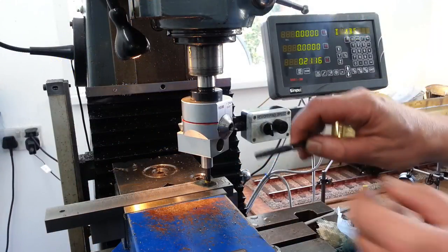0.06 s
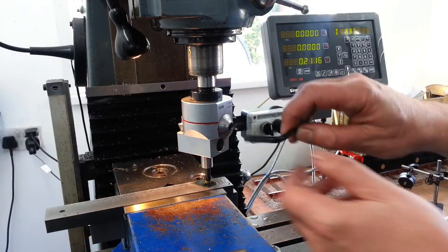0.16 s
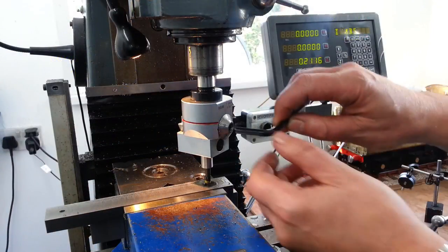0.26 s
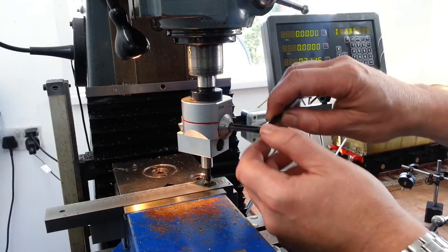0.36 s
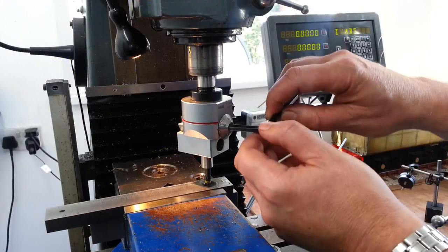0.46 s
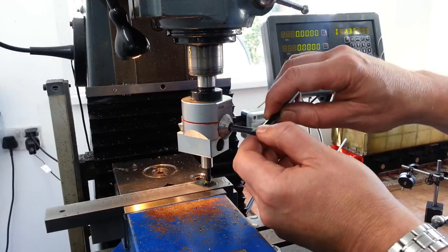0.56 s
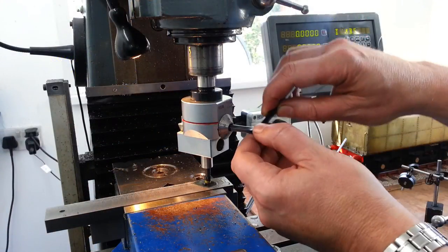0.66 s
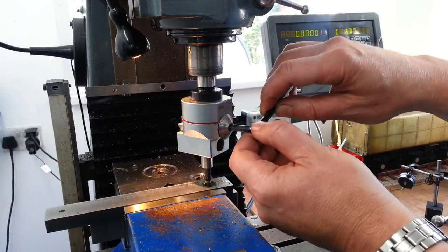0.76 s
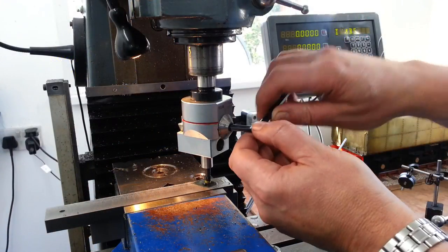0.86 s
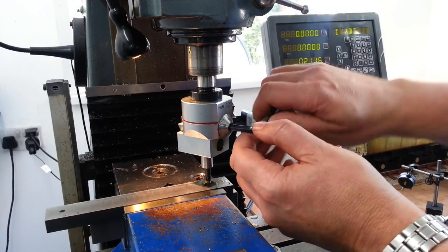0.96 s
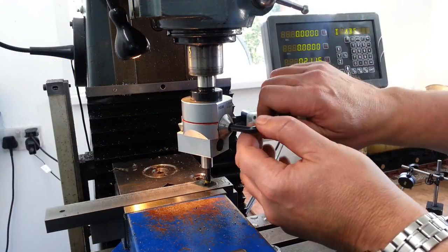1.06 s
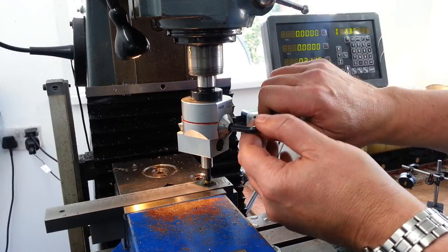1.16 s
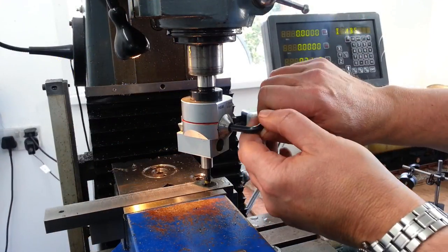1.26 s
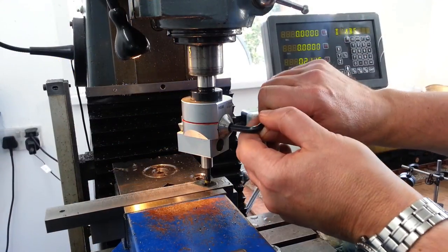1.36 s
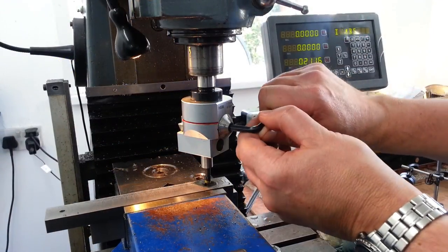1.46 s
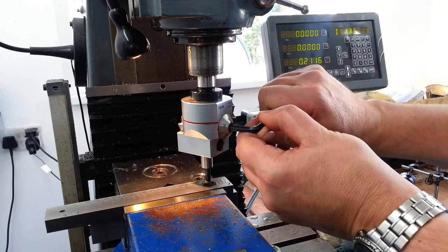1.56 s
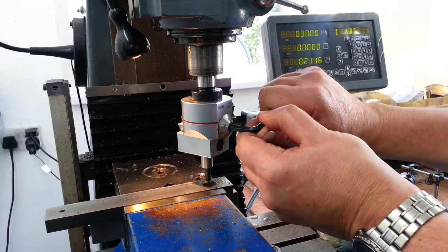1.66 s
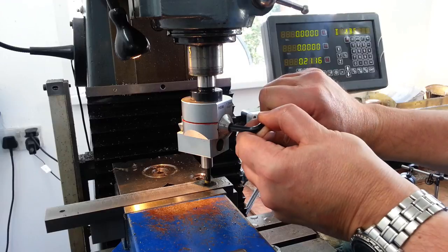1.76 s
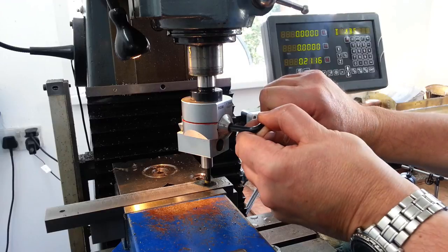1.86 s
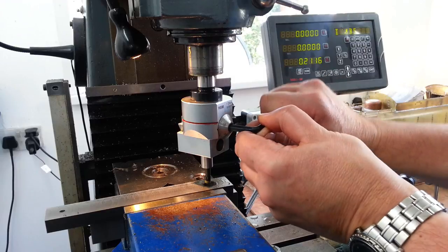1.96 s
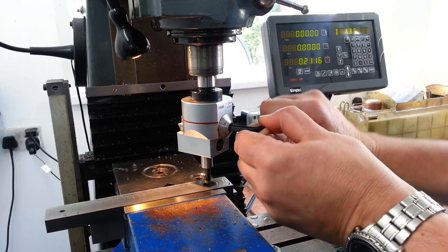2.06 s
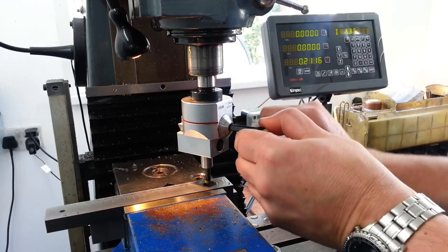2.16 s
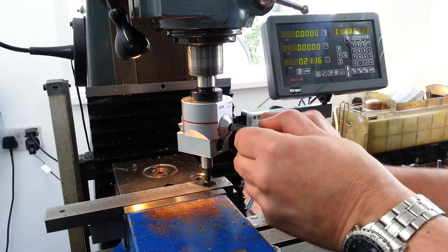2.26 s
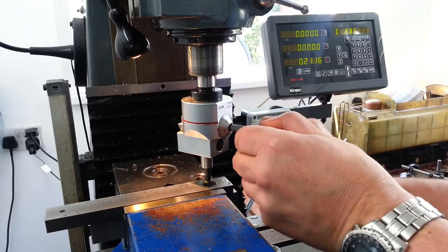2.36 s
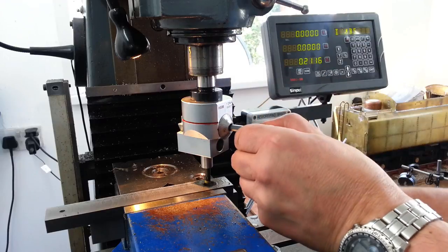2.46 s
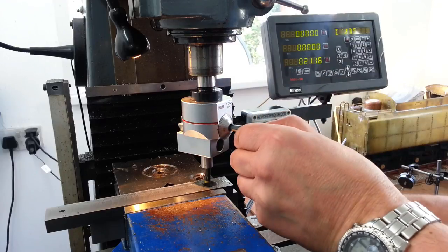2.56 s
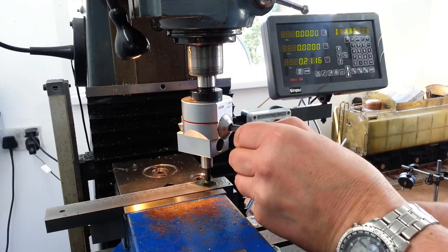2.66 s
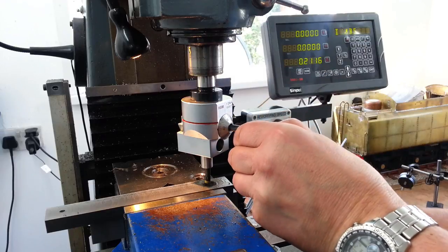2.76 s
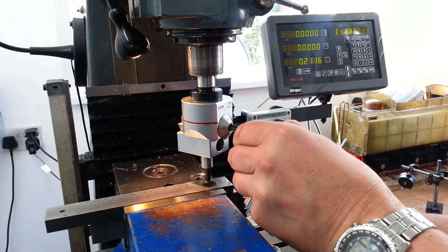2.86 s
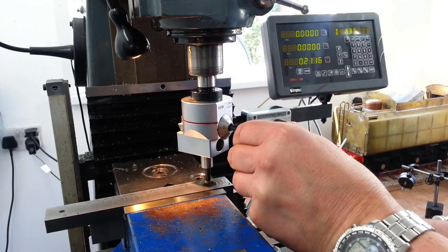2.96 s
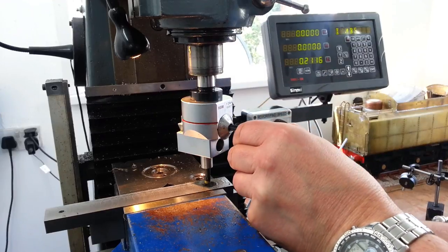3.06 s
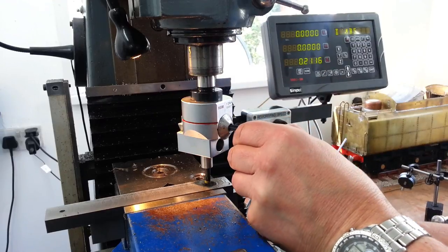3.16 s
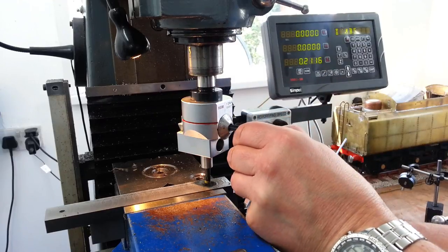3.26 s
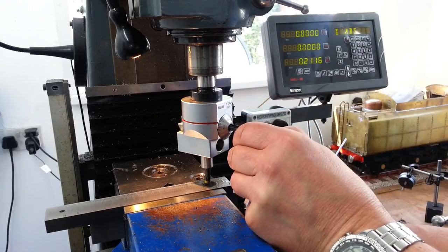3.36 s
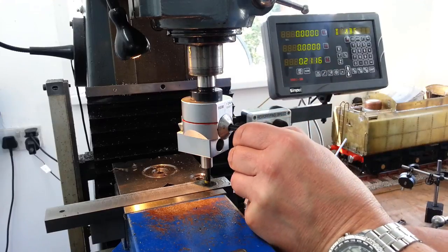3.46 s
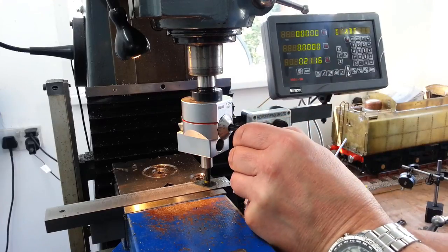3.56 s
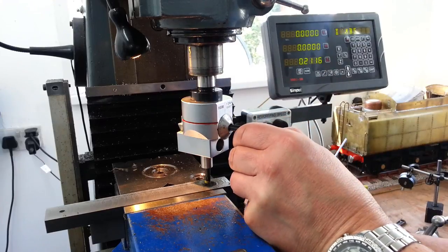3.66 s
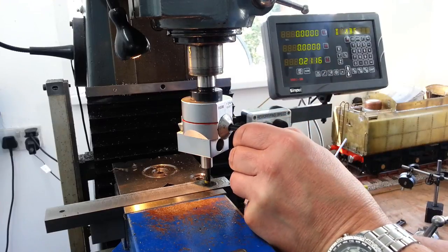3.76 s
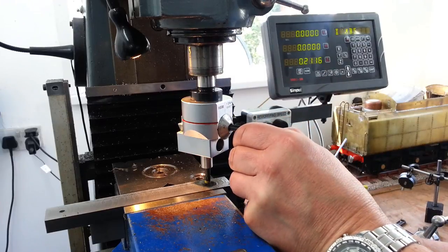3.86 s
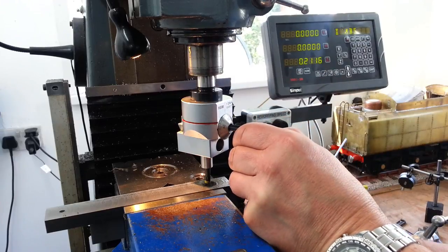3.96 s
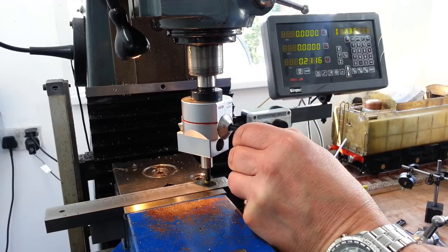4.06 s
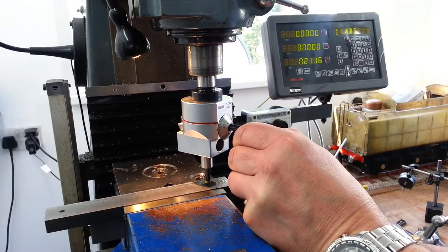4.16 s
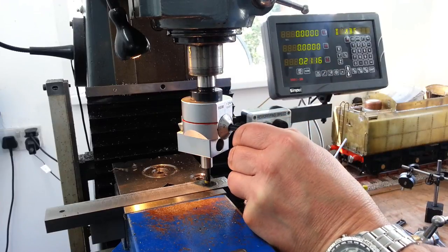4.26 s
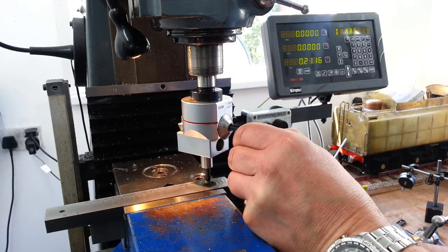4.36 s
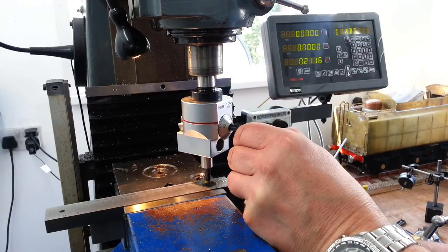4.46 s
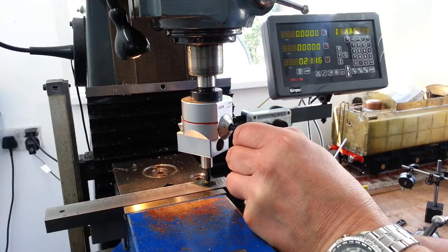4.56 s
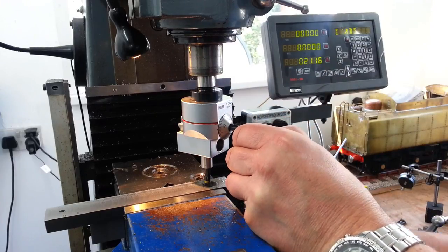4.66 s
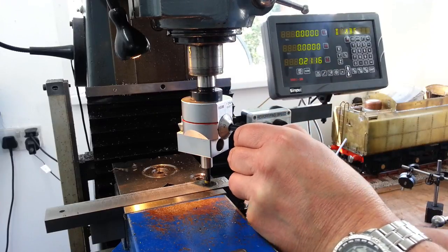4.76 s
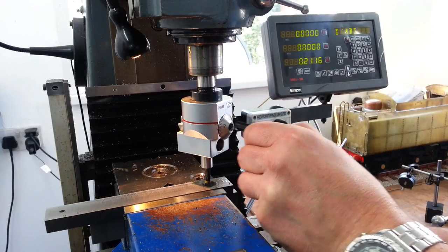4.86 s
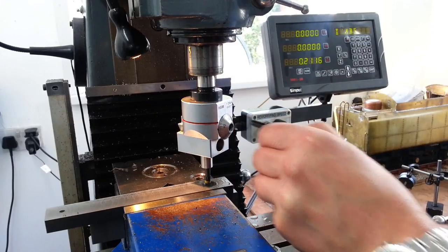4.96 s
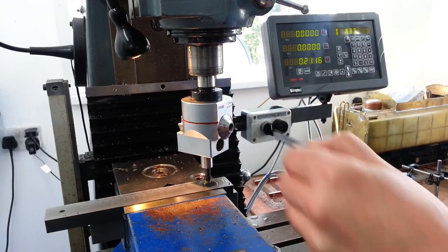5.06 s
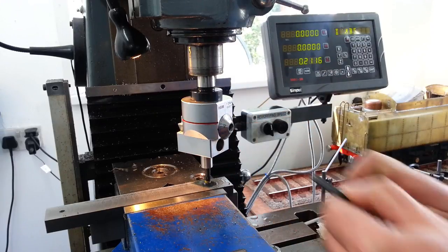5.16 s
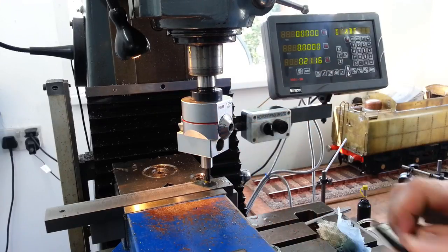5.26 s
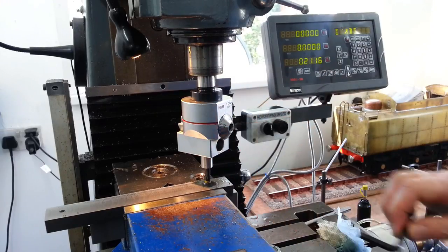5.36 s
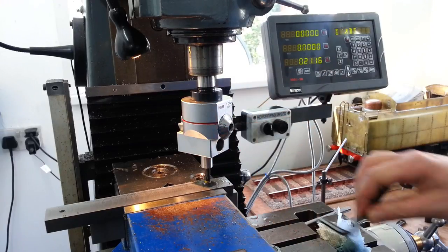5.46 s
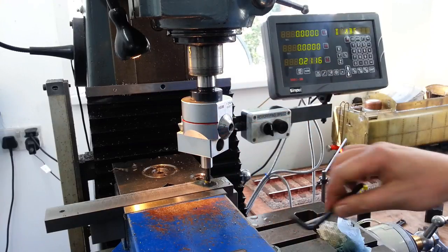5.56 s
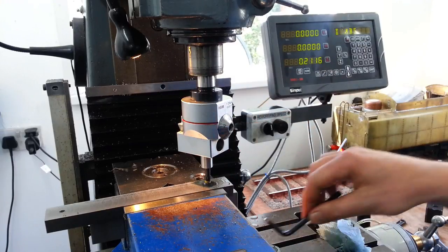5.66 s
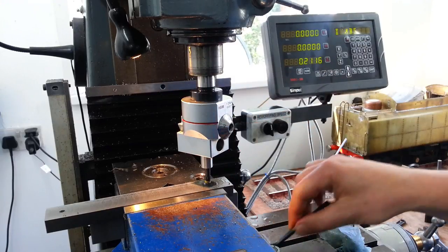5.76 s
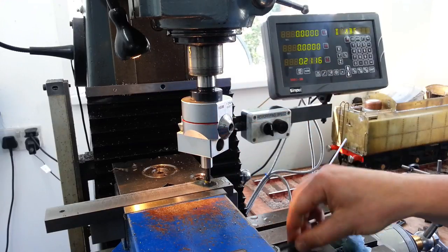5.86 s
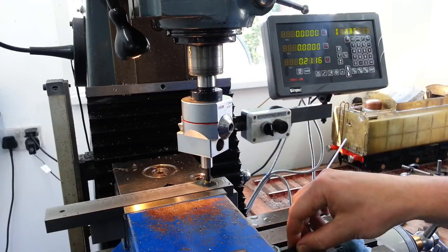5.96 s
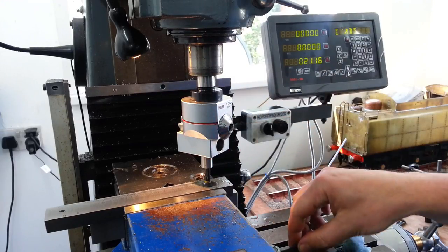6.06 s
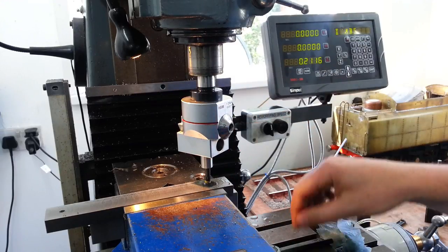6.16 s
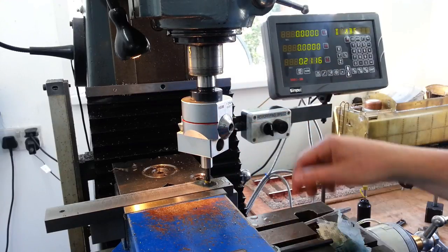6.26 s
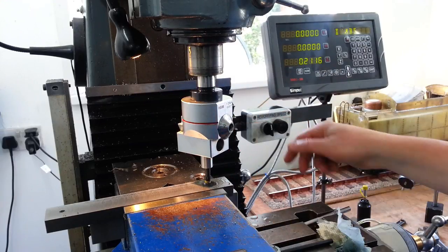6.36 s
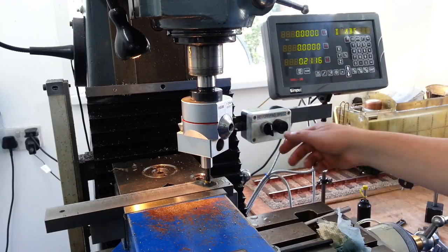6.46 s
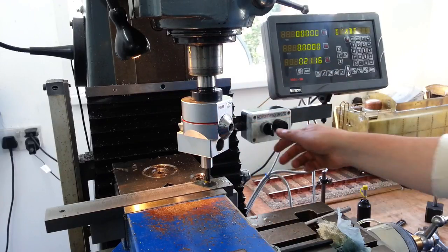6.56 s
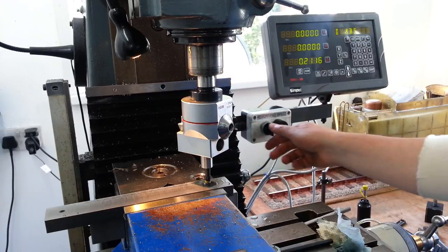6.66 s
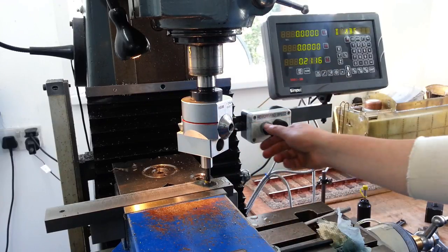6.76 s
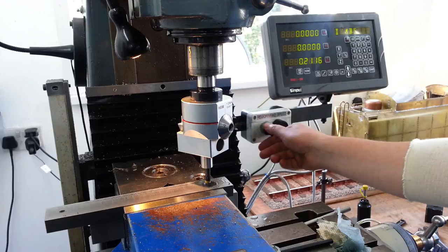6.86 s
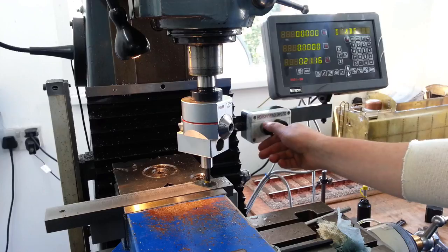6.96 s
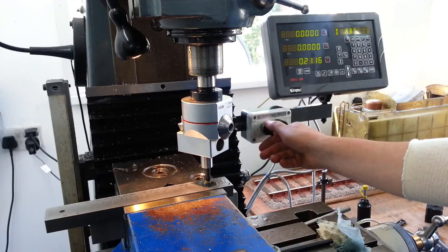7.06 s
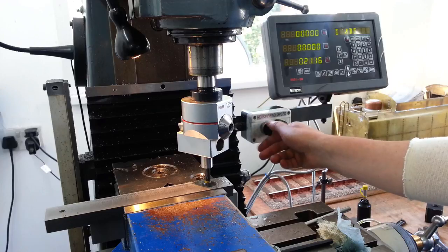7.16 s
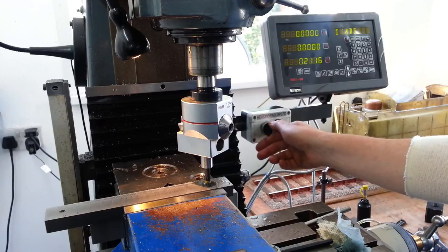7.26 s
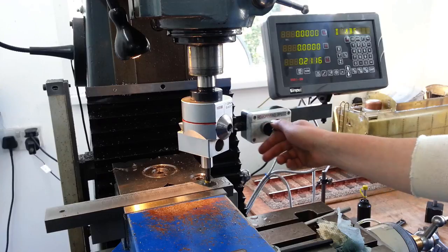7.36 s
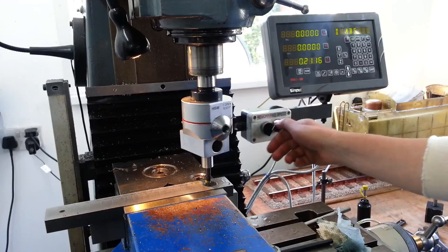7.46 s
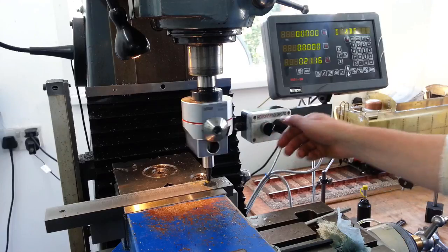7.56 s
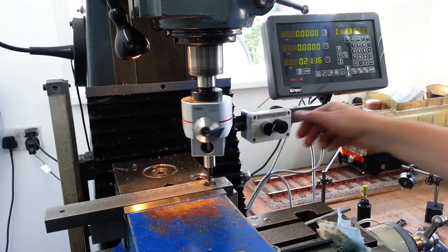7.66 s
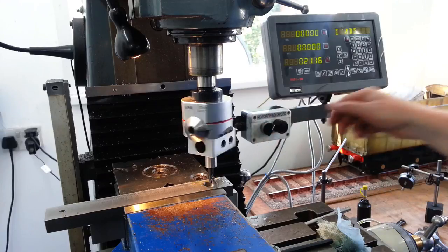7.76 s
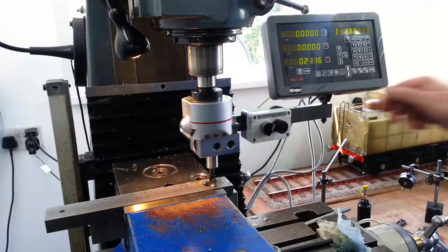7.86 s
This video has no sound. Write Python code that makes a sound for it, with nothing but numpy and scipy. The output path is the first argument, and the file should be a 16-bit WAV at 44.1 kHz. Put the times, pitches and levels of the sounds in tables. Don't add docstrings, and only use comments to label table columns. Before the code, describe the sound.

Constant low hum and buzzing laminations, with faint fan and air noise behind. First come a few light steel ticks and dull bumps, then mostly hum. Near the end, a small metal key comes loose and lands on iron with bright ringing bounces; soft finger touches lead to a sharp, rattling switch snap. A thin electronic whine follows, then a rough burst of gear clatter as the machine starts. Stereo pickup nearby in a hard, lively room.

```python
import sys
import numpy as np
from scipy import signal
from scipy.fft import irfft
from scipy.io import wavfile

SR = 44100
rng = np.random.default_rng(int(sys.argv[2]) if len(sys.argv) > 2 else 0)


def to_wav(sig):
    pcm = np.clip(np.atleast_2d(sig), -1, 1) * 32767
    pcm = np.round(pcm).astype(np.int16)
    wavfile.write(sys.argv[1], SR, pcm.T)


def volts(x):
    e = np.asarray(x, float) / 20
    return 10 ** e


N = 349704


def in_time(rows):
    s, *columns = np.transpose(rows)
    return [np.interp(np.arange(N) / SR, s, column) for column in columns]


def at_hz(points, hz):
    table_hz, values = np.transpose(points)
    return np.interp(np.log(hz), np.log(table_hz), values)


def rms_one(x):
    return x / np.sqrt(np.mean(x ** 2) + 1e-20)


def band(x, low_hz, high_hz):
    return signal.sosfilt(signal.butter(2, [low_hz, high_hz], "band", fs=SR, output="sos"), x)


def top_cut(x):
    return signal.sosfilt(signal.ellip(8, .5, 45, 14650, fs=SR, output="sos"), x)


def drift(rate_hz):
    r = np.exp(-80 * np.pi * rate_hz / SR)
    slow = signal.lfilter([1], [1, -2 * r, r * r], rng.standard_normal(N // 40 + 2002))[2000:]
    return np.interp(np.arange(N) / 40, np.arange(len(slow)), rms_one(slow))


def resonate(x, modes):
    out = 0
    for k, (hz, width_hz, db) in enumerate(modes):
        r = np.exp(-np.pi * width_hz / SR)
        poles = [1, -2 * r * np.cos(2 * np.pi * hz / SR), r * r]
        out = out + (-1) ** k * volts(db) * rms_one(signal.lfilter([1, 0, -1], poles, x))
    return rms_one(out)


def stereo(mid, side, alike):
    return np.sqrt(1 + alike) * mid + np.sqrt(1 - alike) * side * [[1], [-1]]


def add(track, s, sound):
    i = round(s * SR)
    track[i:i + len(sound)] += sound[:N - i]


def burst(decay_s):
    crack = rng.standard_normal(SR // 2) * np.exp(-np.arange(SR // 2) / (decay_s * SR))
    return crack / np.abs(crack).max() + 1e-18


def ring(hz, db, t60):
    t = np.arange(SR // 2) / SR
    return volts(db - 60 * t / t60) * np.sin(2 * np.pi * hz * t) * (1 - np.exp(-t / .0006))


# (time [s], frequency [Hz])
MAINS = [(0, 49.925), (8, 49.905)]
# (mains multiple, left level [dB], right level [dB], right lead [rad])
CORE = [(2, -80.7, -71.5, -0.5), (4, -58.1, -58.2, 0.2), (6, -65.3, -66.1, 0.5), (8, -64.5, -61.8, 0.5),
        (10, -75.4, -66.0, 1.0), (12, -58.1, -53.7, 0.4), (16, -68.1, -72.9, 2.1), (22, -66.9, -78.4, 2.4),
        (26, -70.4, -70.3, 2.2)]
# (mains multiple, left level [dB], right level [dB], right lead [rad])
LAMINATIONS = [(30, -71.9, -71.9, 3.1), (36, -74.9, -71.5, 2.5), (50, -67.3, -69.7, 0.8),
               (52, -68.1, -72.4, 2.5), (54, -74.5, -70.0, -0.8), (56, -66.5, -61.8, 0.5),
               (58, -81.4, -70.6, 1.8), (60, -70.1, -77.3, 1.7), (64, -64.5, -67.1, 2.9),
               (68, -71.4, -72.8, -0.1), (70, -75.7, -65.7, -0.5), (72, -77.2, -65.0, 0.8),
               (74, -74.8, -67.9, 2.0), (76, -77.1, -70.4, -0.4)]
# (frequency [Hz], level [dB])
FAINT_COMB = [(500, -80), (1500, -77), (2500, -76), (3800, -77), (5000, -83), (6500, -92)]
# (time [s], level of the 12th multiple [dB])
ARM = [(0, 2), (1, 0), (5.6, -1.5), (5.9, 5), (6.5, 2.5), (7.2, 3), (7.9, 8)]


def hum():
    spectra = np.zeros((4, 2, 4097), complex)
    lines = {k: row for k, *row in CORE + LAMINATIONS}
    for k in range(2, 128):
        left, right, lead, start, *sway = rng.standard_normal(6)
        faint_db = at_hz(FAINT_COMB, k * 50) - 10.0 * (k % 2)
        faint = (faint_db + 3.0 * left, faint_db + 3.0 * right, 9 * lead)
        left_db, right_db, lead_rad = lines.get(k, faint)
        phase = 9 * start + np.array([0, lead_rad])
        spectra[0, :, k] = volts([left_db, right_db]) * np.exp(1j * phase)
        spectra[1, :, k] = spectra[0, :, k] * (sway[0] + 1j * sway[1])
    spectra[2, :, 12] = spectra[0, :, 12]
    spectra[3, :, 56] = spectra[0, :, 56]
    cycle = irfft(spectra) * 4096 * np.sqrt(2)
    place = (np.cumsum(in_time(MAINS)[0]) / SR * 8192).astype(int) % 8192
    steady, unsteady, twelfth, fifty_sixth = cycle[:, :, place]
    arm_db, = in_time(ARM)
    arm = (volts(arm_db) - 1) * twelfth + (volts(.1 * arm_db) - 1) * fifty_sixth
    return steady + 0.11 * drift(0.31) * unsteady + arm


# (frequency [Hz], level [dB per Hz])
AIR = [(40, -14.5), (100, -7), (250, 2.5), (450, -3.5), (1000, -6), (1300, -9), (2500, -13.5), (4500, -14),
       (6000, -25), (7500, -16.5), (11000, -17.5), (14300, -17)]
# (frequency [Hz], likeness [0-1])
LIKENESS = [(40, .3), (120, 0.013), (300, 0.41), (800, 0), (1400, 0.057), (15000, 0.0)]
# (time [s], level [dB])
OUTSIDE = [
    (0.0, -58),
    (0.66, -57),
    (2.12, -62.5),
    (5.0, -64),
    (7.93, -60),
]


def air():
    noise = 0
    edges = 30 * 2 ** np.arange(0, 9.1, .45)
    white = rng.standard_normal((2, 2, N))
    swell_db = in_time(OUTSIDE)[0] + 66
    for k, (low, high) in enumerate(zip(edges, edges[1:])):
        mid, side = band(white[k % 2], low, min(high, 16000))
        hz = np.sqrt(low * high)
        alike = np.clip(at_hz(LIKENESS, hz), -1, 1)
        traffic_share = at_hz([(150, 0.16), (700, 0.9), (1600, 0.38), (4000, 0.22)], hz)
        gain = volts(at_hz(AIR, hz) + traffic_share * swell_db + 0.14 * drift(1.7))
        noise = noise + gain * stereo(mid, side, alike)
    tyres = volts(-81.0 + 1.9 * swell_db) * np.array([resonate(w, [(1003, 65, 0)]) for w in white[1]])
    fan = volts(-75.5) * resonate(white[0, 0], [(120, 2.6, 0)])
    return volts(-54) * rms_one(top_cut(noise)) + tyres + fan


# (time [s], crack level [dB], ring frequency [Hz], ring level [dB], hardness [dB])
IN_SCREW = [
    (0.3471, -27.5, 4150, -31.5, -21),
    (0.4927, -32.5, 3500, -34, -23),
    (.4995, -37, 3960, -28.5, -16),
    (0.5081, -26.5, 3560, -35, -34),
    (.511, -40, 4310, -31, -22),
    (.7964, -25.5, 4700, -30.5, -23),
    (4.8290, -30.5, 3770, -45, -13),
    (4.833, -37, 2820, -52, -14),
    (4.836, -42, 3030, -38, -2),
    (4.8462, -40, 4250, -34, -22),
]
# (frequency [Hz], level [dB], t60 [s])
KEY_HELD = [(7800, -10, .006), (8300, -8, .005), (8800, -3, .01)]


def key_in_screw():
    out = np.zeros(N)
    click = signal.unit_impulse(SR // 2) + 1e-18
    crack = volts(20) * band(click, 1800, 5300) + volts(15) * band(click, 3260, 9800)
    edge = band(click, 7300, 9000)
    sizzle = band(click, 9000, 14300)
    for s, crack_db, hz, ring_db, hard_db in IN_SCREW:
        high_db = crack_db + hard_db
        t60 = .024 if s < .4 else .007
        sound = volts(crack_db) * crack
        sound += ring(hz, ring_db + 5.5, t60) + ring(hz * .95, ring_db - 5.0, t60)
        sound += volts(crack_db + 8.0 + .3 * (hard_db + 18)) * sizzle
        sound += volts(high_db + 37.0) * edge
        for held_hz, db, held_t60 in KEY_HELD:
            sound += ring(held_hz, high_db + db + 13.5, held_t60)
        add(out, s, sound)
    return out


# (time [s], level [dB], centre frequency [Hz])
THUDS = [
    (.49, -41, 473),
    (.64, -44, 500),
    (.81, -44.5, 716),
    (.87, -52, 700),
    (3.55, -44.5, 470),
    (5.937, -42, 800),
]


def thuds():
    out = np.zeros(N)
    for s, db, hz in THUDS:
        add(out, s, volts(db + 22.0) * band(burst(0.023), hz * 0.54, hz * 1.48))
    return out


# (time [s], clatter level [dB], ring level [dB],
# hardness [dB per octave above 3 kHz], extra level of the short arm [dB])
ON_TABLE = [
    (5.7787, -12, -33.5, 1.5, 11),
    (5.7984, -24, -40, -2, -3),
    (5.83, -18, -27.5, -7, -4),
    (5.8441, -22, -28, -8.5, 0),
    (5.9349, 3.5, -27.5, 4.5, -2.5),
    (5.953, -11, -28, 1.5, 0),
    (5.974, -6.5, -45, -1, 0),
]
# (frequency [Hz], level [dB], t60 [s])
LONG_ARM = [(2985, 2, 0.06), (3025, -3, 0.043), (4900, -14, 0.023), (7870, -7, 0.18), (7920, -11, 0.13),
            (8280, -11, 0.1), (14365, -8, 0.16), (14425, 2, 0.08), (14398, 4, 0.14)]
# (frequency [Hz], level [dB], t60 [s])
SHORT_ARM = [(1840, -14, 0.12), (4060, 0, 0.06), (8820, -8, 0.06)]


def key_on_table():
    out = np.zeros(N)
    for s, clatter_db, ring_db, hardness_db, short_db in ON_TABLE:
        clatter = burst(0.0056)
        sound = volts(clatter_db - 10.5) * (band(clatter, 1930, 5600) + volts(-0.5) * band(clatter, 8300, 15000))
        damping = .35 if s < 5.9 else 1
        for hz, db, t60 in LONG_ARM + [(hz, db + short_db, t60) for hz, db, t60 in SHORT_ARM]:
            struck_db = ring_db + hardness_db * max(np.log2(hz / 3000), 0)
            sound += ring(hz, struck_db + db + 3.5, t60 * damping)
        add(out, s, sound)
    return band(out * volts(2.5 * drift(80)), 1400, 16000)


# (time [s], level [dB])
FINGER = [
    (6.767, -34.5),
    (6.79, -50),
    (6.931, -40.5),
    (7.152, -40),
    (7.535, -37),
    (7.57, -41),
]
# (time [s], level [dB])
CLACK = [
    (7.1864, 0),
    (7.189, -3),
    (7.1908, -13),
    (7.194, -2.5),
    (7.197, -22),
    (7.2059, -8),
    (7.208, -27),
    (7.218, -13.5),
    (7.241, -11.5),
]
# (frequency [Hz], level [dB per Hz])
SWITCH_BOX = [(120, -58), (200, -31), (1070, -9.5), (1220, -16), (1360, -10), (1600, -6), (2420, -2.5),
              (3600, -5), (5450, -18.5), (5970, -27.5), (7550, -23), (13500, -22.5), (15000, -38)]
# (frequency [Hz], level [dB], t60 [s])
BOX_PANELS = [(1080, -35, .12), (1390, -34, .12), (1950, -31, .11), (2120, -32, .1), (2370, -28, .11),
              (3050, -37, .08), (3500, -32, .08)]


def switch():
    hits, panels = np.zeros(N) + 1e-18, np.zeros(N)
    for s, db in FINGER:
        rub = burst(0.0027)
        add(hits, s, volts(db - 0.5) * band(rub, 840, 12000))
        add(panels, s, volts(db - 11.0) * band(rub, 2800, 5000))
    for s, db in CLACK:
        add(hits, s, volts(db + 5.0) * signal.unit_impulse(9, 4))
        add(panels, s, sum(ring(hz, db + level_db, t60) for hz, level_db, t60 in BOX_PANELS))
    out = panels
    edges = np.geomspace(200, 15500, 25)
    for k, (low, high) in enumerate(zip(edges, edges[1:])):
        colour_db = at_hz(SWITCH_BOX, np.sqrt(low * high)) + 13
        out = out + (-1) ** k * volts(colour_db) * band(hits, low, high)
    return out


def jolt():
    shake, thump = np.zeros(N), np.zeros(N)
    snap_s = CLACK[0][0]
    add(shake, snap_s, volts(-28) * band(burst(.006), 20, 70))
    add(thump, snap_s, volts(-10) * band(burst(0.027), 173, 200))
    return shake * [[1], [-.3]] + thump


CREEP_S = 7.44


def load(creep_db, jolt_db, running_db, swell_s):
    t = np.arange(N) / SR
    since_bite = np.maximum(t - 7.699, 0)
    creep = volts(creep_db) * np.clip((t - CREEP_S) / .07, 0, 1)
    lurch = volts(jolt_db - 60 * since_bite / .42) * (1 - np.exp(-since_bite / 0.0035))
    running = volts(running_db) * np.minimum(since_bite / swell_s, 1)
    return np.sqrt(creep ** 2 + lurch ** 2 + running ** 2)


def whine():
    t = np.arange(N) / SR
    spread_hz = 20 + 10 * (2 ** (np.maximum(t - CREEP_S, 0) / .2) - 1)
    beat = np.cos(2 * np.pi * np.cumsum(spread_hz) / SR / 2 + 2.0 * drift(26))
    tone = np.sin(2 * np.pi * 7940 * t + 1.8 * drift(30)) * (1 + .9 * beat)
    level = volts(-59.5 + 3.0 + 3.0 * drift(20))
    return tone * level * np.clip((t - 7.25) / .08, 0, 1)


# (frequency [Hz], width [Hz], level [dB])
CASTING = [(264, 74, -7.5), (384, 50, 1.5), (447, 56, 0.5), (537, 51, -3.5)]
# (frequency [Hz], width [Hz], level [dB])
HEAD = [(650, 97, 0), (797, 134, 2.5), (900, 70, 1), (1030, 110, -4.5)]
# (frequency [Hz], width [Hz], level [dB])
COVER = [(1316, 34, 6.5), (1450, 150, 10), (2620, 3200, 2.5)]
# (time [s], level [dB])
KNOCKS = [
    (7.701, -32),
    (7.711, -25),
    (7.716, -26),
    (7.727, -21),
    (7.736, -30),
    (7.762, -27),
    (7.816, -29),
    (7.857, -31),
]


def motor():
    struck = rng.random(N) < 1500 / SR
    knocks = struck * volts(2.5 * rng.exponential(1, N)) * rng.choice([-1, 1], N)
    body = load(creep_db=-48, jolt_db=-30, running_db=-40, swell_s=.15) * resonate(knocks, CASTING)
    body += load(creep_db=-54, jolt_db=-28, running_db=-43, swell_s=.1) * resonate(knocks, HEAD)
    body += load(creep_db=-62, jolt_db=-48, running_db=-45, swell_s=.13) * resonate(knocks, COVER)
    click = signal.unit_impulse(SR // 4) + 1e-18
    for s, db in KNOCKS:
        add(body, s, volts(db + 24.0) * band(click, 340, 1230) + volts(db + 5.0) * band(click, 1200, 3500))
    return body


# (frequency [Hz], t60 [s])
ROOM_T60 = [(200, 0.26), (500, 0.65), (1400, 0.4), (3700, 0.4), (9700, 0.46), (15000, 0.14)]


def room(x, pan_db, lag_s, wet_db):
    t = np.arange(int(.8 * SR)) / SR
    edges = np.geomspace(60, 16000, 13)
    tail = 0
    for low, high in zip(edges, edges[1:]):
        mid, side = band(rng.standard_normal((2, len(t))), low, high)
        alike = np.clip(at_hz([(150, 0.93), (600, 0.61), (1300, 0.061)], low), 0, 1)
        fade = volts(-60 * t / at_hz(ROOM_T60, np.sqrt(low * high))) * np.clip((t - .002) / 0.0012, 0, 1)
        fade *= 1 + 1.4 * np.exp(-t / 0.014)
        tail = tail + fade * stereo(mid, side, alike)
    tail = volts(wet_db) * top_cut(tail) / np.sqrt(np.sum(tail ** 2) / 2)
    lag = round(lag_s * SR)
    tail[0, max(lag, 0)] += volts(pan_db / 2)
    tail[1, max(-lag, 0)] += volts(-pan_db / 2)
    return signal.oaconvolve(x[None], tail, axes=1)[:, :N]


def scene():
    screw = room(key_in_screw() + thuds(), pan_db=6.5, lag_s=.0003, wet_db=0.5)
    table = room(key_on_table(), pan_db=1, lag_s=-.0001, wet_db=-3.5)
    table[1] = signal.sosfilt(signal.butter(1, 9000, fs=SR, output="sos"), table[1])
    box = room(switch(), pan_db=3.5, lag_s=-.0003, wet_db=4.5)
    head = room(motor() + whine(), pan_db=-0.5, lag_s=.0003, wet_db=-3.5)
    return hum() + air() + screw + table + box + head + jolt()


def low_pass(x):
    return signal.sosfilt(signal.butter(12, 15930, fs=SR, output="sos"), x)


def record(dry):
    dull = signal.sosfilt(signal.butter(8, 15600, fs=SR, output="sos"), dry)
    rounded = 0.89 * np.tanh(dull / 0.84)
    return low_pass(rounded)


dry = scene()
out = record(dry)
to_wav(out)
```